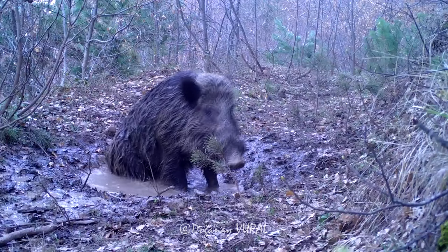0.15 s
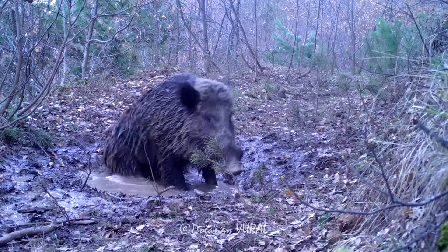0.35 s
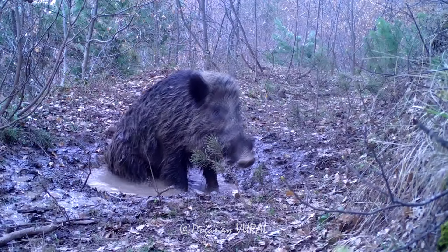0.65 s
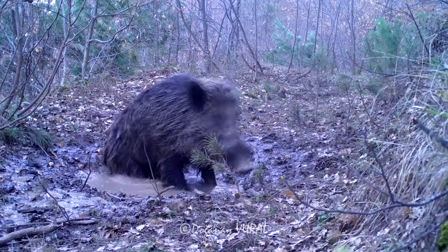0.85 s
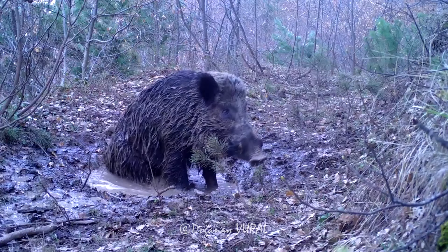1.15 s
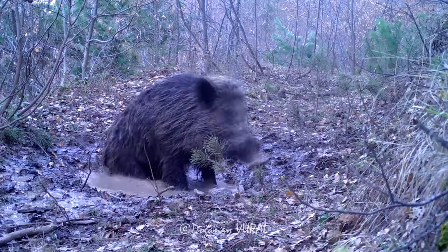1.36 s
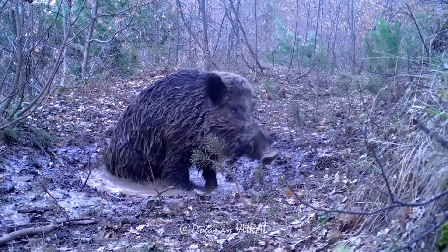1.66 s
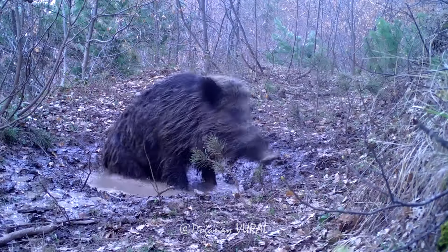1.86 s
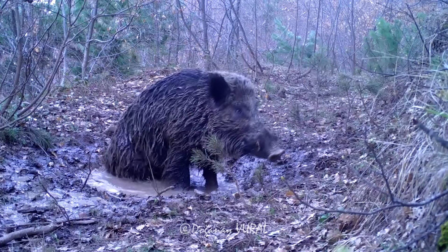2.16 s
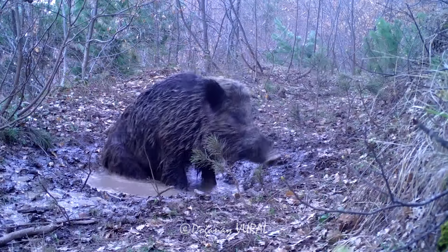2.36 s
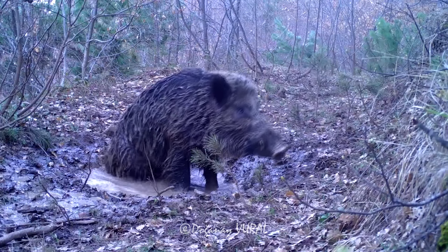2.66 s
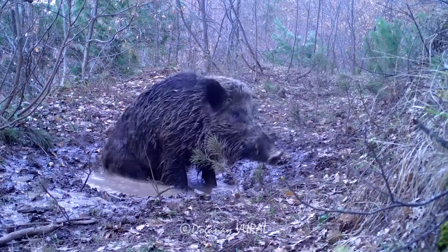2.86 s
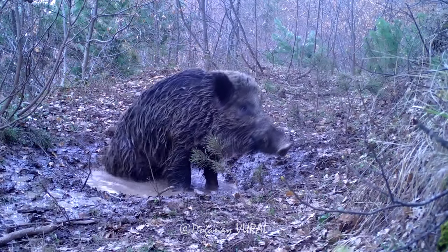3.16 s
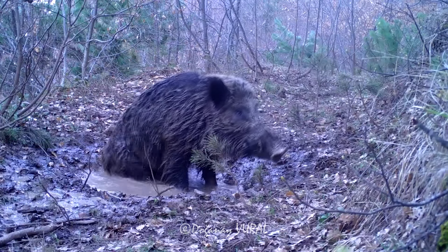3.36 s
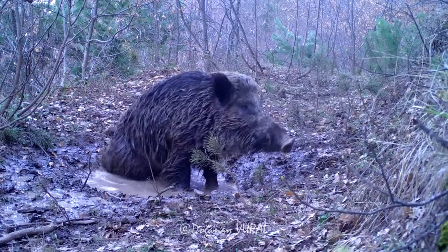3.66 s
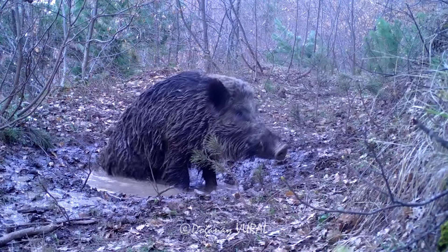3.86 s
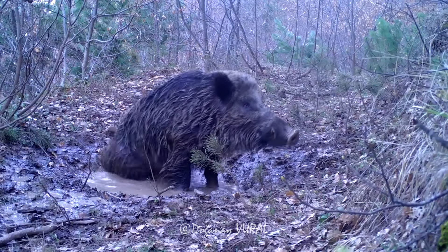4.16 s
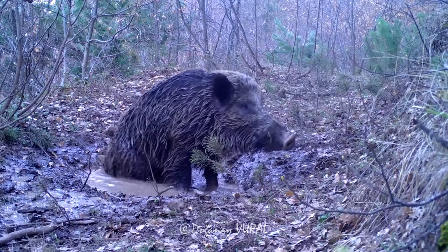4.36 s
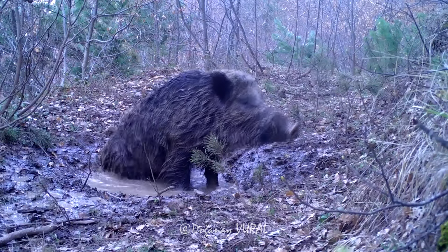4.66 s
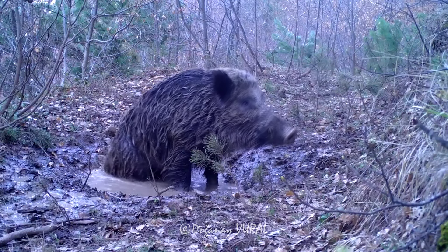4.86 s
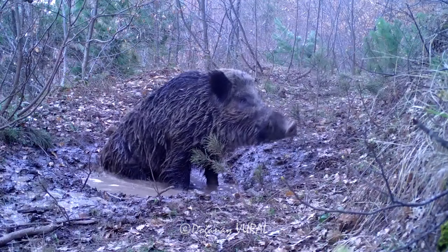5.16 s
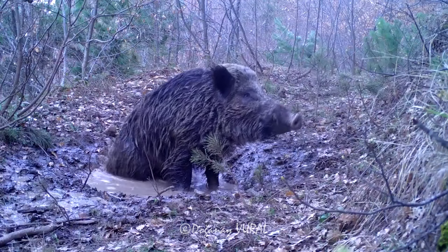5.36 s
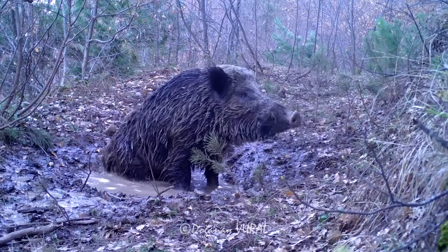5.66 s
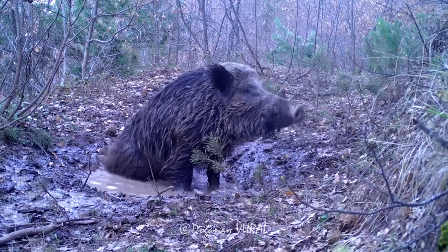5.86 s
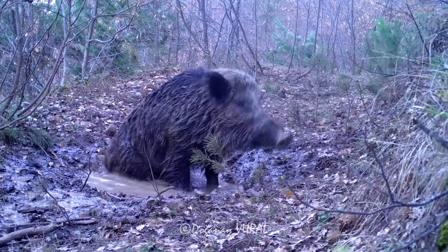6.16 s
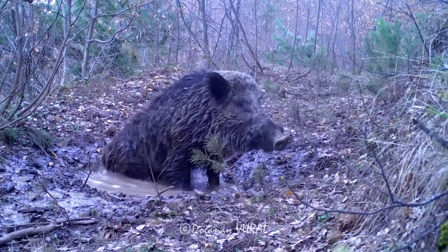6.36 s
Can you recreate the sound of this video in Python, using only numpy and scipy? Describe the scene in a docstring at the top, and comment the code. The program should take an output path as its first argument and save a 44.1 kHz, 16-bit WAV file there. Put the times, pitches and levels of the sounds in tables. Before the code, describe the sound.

A boar sits in a muddy forest puddle, smacking its wet mouth in crisp, sticky clicks, crowded in the first three seconds and sparser later. Mud fizzes and squelches softly, with small bubbly pops and gulps. High thin bird calls come near one second and more faintly later. The fairly close, dry pickup has bassy noise and a rapid steady electrical flutter.

```python
"""First comes low noise with a steady electric flutter from a trail camera, a faint bird whistle and fizzing mud.
A wild boar soon smacks its wet mouth, 36 times in 6.5 seconds, as it shifts its weight in a forest puddle.
Smacks are bursts of clicks from tearing films; pops and gulps are short rings from air pockets and bubbles.
The mud is made of countless tiny clicks and rings, the birds of gliding whistles with faint forest echoes."""
import sys
import numpy as np
from scipy import signal
from scipy.io import wavfile
from scipy.ndimage import uniform_filter1d

SR = 44100
rng = np.random.default_rng(int(sys.argv[2]) if len(sys.argv) > 2 else 0)


def unload_audio(sound):
    """Save the sound as a 16-bit wav file, at the path given as the first command line argument."""
    columns = np.transpose(np.atleast_2d(sound))
    # keep every value between -1 and 1, then stretch to whole-number steps
    steps = np.round(np.clip(columns, -1, 1) * 32767)
    wavfile.write(sys.argv[1], SR, steps.astype(np.int16))


N = 287091
TIME = np.arange(N) / SR  # seconds
LEAD = 256  # samples of soft build-up before the main click

# colour of the still forest and microphone noise: (frequency [Hz], relative level [dB per Hz])
FLOOR_COLOUR = [(8, 0), (25, -0.5), (90, -3.5), (200, -7.5), (450, -14), (700, -18.5), (1400, -27),
                (2000, -30.5), (3200, -33), (4800, -38), (7700, -40), (9500, -38.5), (13400, -45),
                (14500, -58)]
# whine of the camera electronics: (frequency [Hz], level [dB])
WHINE = [(4017, -69), (7154, -68), (7430, -66)]

# pitch and loudness along each bird note: (share of the note [0-1], pitch [Hz], relative level [dB])
SEE = [(0, 6950, -13), (.22, 7050, -2), (.42, 7550, 0), (.62, 7350, 0), (.85, 6850, -1), (1, 6450, -8)]
SLUR = [(0, 6600, -14), (.06, 5000, -4), (.15, 4300, 0), (.3, 4050, 0), (.6, 3930, -4), (1, 3780, -13)]
# second voice of a SEE, from the other side of the bird's voice organ: (share [0-1], pitch [Hz], relative level [dB])
SEE_UPPER = [(0, 7600, -1), (.3, 8400, -5), (.7, 9000, -5), (1, 9100, -5)]
# more bird notes: (share of the note [0-1], pitch [Hz], relative level [dB])
LOW_SLUR = [(0, 4600, -4), (.2, 4080, 0), (.55, 3930, -1), (1, 3790, -9)]
WHISTLE = [(0, 4630, -4), (.25, 4560, 0), (.55, 4540, -2), (1, 4570, -9)]
TRILL = [(0, 3750, 1), (.35, 3500, -5), (.7, 3200, 0), (1, 2930, -12)]
FLOURISH = [(0, 3130, -3), (.45, 3410, 0), (1, 3200, 2)]
# bird calls: (time [s], length [s], level before the note's own shape [dB], note [table above])
BIRDS = [(0, 0.19, -54.5, WHISTLE), (1.163, 0.084, -37, SEE), (1.321, 0.093, -35.5, SEE),
         (1.477, 0.16, -43, SLUR), (4.278, 0.077, -51, SEE), (4.44, 0.11, -51, SEE),
         (4.609, .15, -51.5, LOW_SLUR), (6.077, 0.041, -55, FLOURISH), (6.177, .033, -53, FLOURISH),
         (6.291, 0.088, -43, SEE), (6.426, 0.034, -53, FLOURISH), (6.456, .086, -40, SEE)]

# slow drift in how much the mud is stirred: (time [s], stirring level [dB])
STIR_DRIFT = [(0.0, -50), (0.43, -48), (0.98, -48), (1.4, -47), (1.83, -50), (4.02, -52.5), (4.11, -51.5),
              (5.66, -53.5), (6.36, -51), (6.51, -47)]
# the boar shifts its weight: (time of the peak [s], added fizz stirring [dB], added squelch stirring [dB])
WEIGHT_SHIFTS = [(.29, -55, -54), (.82, -52, -52), (1.33, -53, -53), (1.72, -44.5, -55), (3.24, -49.5, -60),
                 (3.37, -49.5, -58), (3.93, -50, -60), (4.23, -48, -56), (5.34, -50, -58.5),
                 (6.5, -46, -56)]
# colour of the fine fizz of wet mud: (frequency [Hz], relative level [dB])
FIZZ_COLOUR = [(2530, -22), (4300, -18), (4770, -47), (5100, 4), (6420, 3.5), (8050, 7), (8600, 3),
               (9650, -1.5), (11300, -4.5), (13400, -11), (14500, -22), (16000, -48)]
# colour of the coarse squelch: (frequency [Hz], relative level [dB])
SQUELCH_COLOUR = [(500, -23), (900, -4), (1400, 5.5), (2000, -11.5), (2800, 4.5), (4000, 2), (5200, 2),
                  (7000, -31)]

# air pockets that open: (time [s], length of the tear [s], starting pitch [Hz], level over 5 ms [dB])
POPS = [(.1746, 0.0046, 1320, -37.5), (.4863, 0.0023, 1080, -36.5), (.781, 0.0023, 1300, -35),
        (.804, 0.0073, 1290, -36), (1.232, 0.0041, 1280, -35.5), (1.369, 0.0029, 1320, -37),
        (1.965, 0.002, 1100, -37.5), (2.7742, 0.0027, 1270, -35.5), (2.8106, 0.0013, 1390, -30),
        (2.972, 0.0013, 1330, -40), (3.053, .0015, 1160, -37.5), (5.6005, 0.00044, 1370, -26),
        (6.1421, 0.0016, 1370, -25.5)]
# ways an air pocket rings: (multiple of its pitch [ratio], relative level [dB], time to fall 60 dB [s])
POCKET_MODES = [(.82, -13, 0.018), (1, 14.5, 0.008), (1.16, 5, 0.012)]
# the soft walls damp what lies outside: (lowest frequency [Hz], highest frequency [Hz])
POP_BAND = (796, 1830)
# single bubbles and gulps: (time [s], length [s], first pitch [Hz], last pitch [Hz], level over 5 ms [dB])
GULPS = [(.147, .013, 1330, 2100, -40.5), (.249, .016, 467, 517, -38.5), (.368, 0.022, 622, 1134, -32.5),
         (.683, .02, 1870, 2520, -39.5), (0.779, 0.043, 400, 433, -34.5),
         (2.811, 0.0087, 1150, 1080, -31.5), (5.574, .009, 2800, 3050, -35.5),
         (5.584, 0.018, 440, 456, -31.5), (5.602, 0.005, 700, 850, -37.5), (6.123, 0.017, 474, 530, -29.5),
         (6.142, .006, 650, 800, -39.5), (6.143, 0.011, 1240, 1210, -40)]

# smacks of the mouth, levels over 5 ms: (time [s], length of the tear [s], brightness guide [Hz],
# treble level [dB], middle level [dB], lips part this much earlier [s], treble level of the parting lips [dB])
SMACKS = [(0.2109, 0.00063, 6940, -30, -51, .047, -39), (.266, 0.0054, 7500, -38, -38.5, 0.024, -35),
          (.316, 0.0048, 7600, -39, -36.5, .015, -43), (.369, .0013, 7800, -34, -51, 0.0089, -55),
          (.486, .004, 6700, -27, -35.5, .02, -42), (.503, 0.0065, 7740, -23, -34.5, 0.0052, -33),
          (.733, 0.0043, 7950, -33, -37, 0.0069, -36), (.78, 0.0038, 6500, -27, -37.5, 0.0052, -40),
          (.8, .014, 7400, -37, -41, 0.0066, -40), (.893, 0.0033, 8700, -36, -48, .006, -49),
          (1.0141, 0.0046, 7400, -19.5, -34, .024, -32), (1.1806, 0.00089, 7340, -32, -46, 0.019, -41),
          (1.23, 0.0063, 7200, -34, -44, .01, -40), (1.299, 0.011, 7600, -42, -40, 0.0064, -36),
          (1.334, 0.0082, 7300, -41, -38, .004, -46), (1.37, 0.0042, 7350, -40, -34.5, .008, -44),
          (1.518, .007, 7600, -24, -32.5, .006, -30), (1.7424, 0.0012, 6360, -32.5, -54, 0.021, -50),
          (1.7901, .0025, 8050, -25.5, -43, .015, -35), (1.966, .0014, 7700, -36.5, -55, .003, -42),
          (2.022, 0.0042, 7600, -22.5, -38.5, 0.0096, -34),
          (2.2797, 0.0042, 8200, -31.5, -32.5, 0.024, -33), (2.5301, 0.0034, 7740, -25, -36, 0.013, -31),
          (2.8112, .0012, 7350, -39, -44.5, .04, -42), (2.906, 0.0058, 6500, -38.5, -54, 0.01, -40),
          (3.0453, 0.0081, 8900, -25.5, -37, 0.0089, -37), (3.109, 0.0079, 7000, -37.5, -44, 0.016, -38),
          (3.608, 0.0056, 8200, -33, -40, 0.013, -42), (3.983, 0.0013, 6400, -38, -34.5, 0.048, -42),
          (4.146, .0004, 7850, -23, -44, 0.0045, -52), (4.4378, .0015, 7800, -38, -43, 0.0065, -45),
          (4.454, 0.0051, 7800, -33.5, -44, 0.0039, -41), (5.0304, 0.00069, 7500, -35, -44, 0.014, -33.5),
          (5.5562, 0.0027, 7700, -35.5, -45, 0.0043, -44), (5.603, 0.0016, 7800, -29.5, -33, 0.017, -37),
          (6.1443, 0.0012, 7340, -30.5, -34, .0175, -32.5)]
# treble colour of a snap, before its brightness shifts it: (frequency [Hz], relative level [dB])
SNAP_TREBLE = [(3500, -54), (4900, -13), (5900, -3), (6900, -2.5), (7400, -2), (8400, 2.5), (9200, -10),
               (11000, -12), (13400, -22.5), (14200, -31), (16000, -34)]
# middle colour of a snap, before a small random shift: (frequency [Hz], relative level [dB])
SNAP_MIDDLE = [(300, -27.5), (1400, 3), (2000, -7.5), (2700, 3), (3900, 0), (4800, -8.5), (6500, -31)]

STIR_USUAL_DB = -50  # usual level of the stirring


def amp(db):
    """Turns decibels into a plain factor."""
    return 10 ** (np.asarray(db) / 20)


def evened(x):
    """Scales a sound to rms 1."""
    return x / np.sqrt(np.mean(x ** 2) + 1e-20)


def burst(x, db):
    """Scales a short sound to the energy of 5 ms at this rms level."""
    return amp(db) * x * np.sqrt(.005 * SR / (np.sum(x ** 2) + 1e-20))


def add(mix, s, sound):
    """Adds a sound into the mix, starting at s seconds."""
    part = mix[max(round(s * SR), 0):][:len(sound)]
    part += sound[:len(part)]


def colour(x, points, shift=1, size=8192):
    """Filters without ringing ahead of time, with the given spectrum and its frequencies scaled by shift."""
    hz, db = np.transpose(points)
    f = abs(np.fft.fftfreq(size, 1 / SR))
    log_gain = np.log(amp(np.interp(np.log(f + 1), np.log(hz * shift), db)))
    # this phase packs the filter's energy at its start
    taps = np.fft.ifft(np.exp(np.conj(signal.hilbert(log_gain)))).real[:size // 2]
    return signal.fftconvolve(x, taps)[:len(x)]


def wander(count, span):
    """Smooth random curve of rms 1, averaged twice over span samples."""
    once = uniform_filter1d(rng.standard_normal(count), int(span))
    return evened(uniform_filter1d(once, int(span)))


def crackle(count, per_s, spread_db):
    """Sparse clicks of either sign, a few larger than the rest."""
    size = amp(spread_db * np.minimum(rng.exponential(1, count), 4))
    sign = rng.choice([-1, 1], count)
    return size * sign * (rng.random(count) < per_s / SR)


def bubble(length, first_hz, last_hz, fade_db=17):
    """A dying ring whose pitch glides as the bubble opens or closes."""
    u = np.linspace(0, 1, int(length * SR))
    pitch = first_hz + (last_hz - first_hz) * u ** 1.3
    level = amp(-fade_db * u) * signal.windows.tukey(len(u), .2)
    return level * np.sin(2 * np.pi * np.cumsum(pitch) / SR)


def tear(length, per_s, first, build_s=0.0017, build_level=0.7, count=1500):
    """Weak clicks swell for LEAD samples up to a main click, then a run of smaller clicks dies away."""
    t = (np.arange(count) - LEAD) / SR
    dying = np.exp(-abs(t) / (1.8 * length))
    swelling = build_level * np.exp(-abs(t) / build_s)
    run = crackle(count, per_s, spread_db=1.5) * np.where(t < 0, swelling, dying)
    run /= np.linalg.norm(run) + 1e-9
    run[LEAD] += first * np.exp(-length / 0.0007)  # the shorter the tear, the stronger its main click
    return run


def snap(length, hz, high_db, mid_db, centre_hz=7600):
    """A tearing film sprays treble clicks over duller ones."""
    brightness = (hz / centre_hz) ** 0.46
    treble = colour(tear(length, per_s=6700, first=2.5), SNAP_TREBLE, brightness, size=1024)
    middle = colour(tear(length, per_s=3000, first=0.8), SNAP_MIDDLE, rng.uniform(0.96, 0.99), size=1024)
    return burst(treble, high_db) + burst(middle, mid_db)


def floor_noise():
    """The still forest and the microphone give a steady noise, strongest in the bass."""
    return amp(-37.5) * evened(colour(rng.standard_normal(N), FLOOR_COLOUR))


def camera():
    """The camera draws current in regular short gulps, which leak into the microphone line; its circuits whine."""
    gulps_per_s, first_s, width_s = 22.25, .0226, 0.00525
    since = (TIME - first_s) % (1 / gulps_per_s)
    sag = -1. * (since < width_s)
    # the link to the line blocks slow changes, and the line rounds off the edges
    sag = signal.lfilter(*signal.butter(1, 42, "high", fs=SR), sag)
    sag = signal.lfilter(*signal.butter(1, 150, fs=SR), sag)
    whine = np.zeros(N)
    for hz, db in WHINE:
        phase = 2 * np.pi * hz * TIME + 2 * wander(N, 1200)
        whine += amp(db) * np.sqrt(2) * np.sin(phase)
    return amp(-27.5) * sag + whine


def forest(x, t60, gap=0.0046):
    """Scattered echoes from the ground and trunks start after gap seconds and fall 60 dB in t60 seconds."""
    t = np.arange(SR // 2) / SR
    taps = crackle(len(t), per_s=2500, spread_db=2.5) * amp(-60 * t / t60) * (t > gap)
    return signal.fftconvolve(x, taps / np.linalg.norm(taps))[:N]


def chirp(length, db, note):
    """One nearly pure gliding whistle that wavers in pitch and strength."""
    share, hz, shape_db = np.transpose(note)
    u = np.linspace(0, 1, int(length * SR))
    pitch = np.interp(u, share, hz) * (1 + .008 * wander(len(u), span=40))
    waver_db = 1.4 * wander(len(u), span=200)
    level = amp(db + np.interp(u, share, shape_db) + waver_db) * signal.windows.tukey(len(u), .1)
    return level * np.sqrt(2) * np.sin(2 * np.pi * np.cumsum(pitch) / SR)


def birds():
    """Single calls, the SEE notes with two voices, and a faint trill of falling notes that tends to swell."""
    out = np.zeros(N)
    for s, length, db, note in BIRDS:
        add(out, s, chirp(length, db, note))
        if note == SEE:
            # the second voice starts a quarter of the way in and lasts 0.54 of the note
            add(out, s + 0.25 * length, chirp(0.54 * length, db - 8, SEE_UPPER))
    trill_start_s, trill_step_s, trill_db = 4.778, .0735, -53
    loudness_db = np.linspace(-4, 0, 12) + rng.uniform(-2.5, 2.5, 12)
    for k, loud_db in enumerate(loudness_db):
        note_s = rng.uniform(.024, .042)
        add(out, trill_start_s + k * trill_step_s, chirp(note_s, trill_db + loud_db, TRILL))
    return out


def stirring():
    """Stirring in dB for fizz and squelch: a slow drift, swells at shifts of weight, and spray after smacks."""
    squelch_usual_db, squelch_follows = -55, 0.33  # squelch moves 0.33 dB for each dB of drift
    shift_s = 0.085  # time from the peak of a shift until its power falls to 1/e
    spray_db, spray_s = -22, 0.03  # spittle fizzes on: level against the smack, decay time of its power
    drift = np.interp(TIME, *np.transpose(STIR_DRIFT))
    # powers are added, so that each cause adds its own energy
    fine = amp(drift) ** 2
    coarse = amp(squelch_usual_db + squelch_follows * (drift - STIR_USUAL_DB)) ** 2
    for s, fizz_db, squelch_db in WEIGHT_SHIFTS:
        swell = np.exp(-((TIME - s) / shift_s) ** 2)
        fine = fine + amp(fizz_db) ** 2 * swell
        coarse = coarse + amp(squelch_db) ** 2 * swell
    for s, _, _, high_db, mid_db, *_ in SMACKS:
        spray = np.exp(-abs(TIME - s) / spray_s) * (TIME > s)
        fine = fine + amp(high_db + spray_db) ** 2 * spray
        coarse = coarse + amp(mid_db + spray_db) ** 2 * spray
    return 10 * np.log10(fine), 10 * np.log10(coarse)


def froth(low_hz, high_hz, per_s, cycles, rise, spread_db=3):
    """Bubbles of many sizes burst at random, each with its own short rising ring."""
    out = np.zeros(N)
    for when, size, loud in rng.random((round(per_s * N / SR), 3)):
        hz = low_hz * (high_hz / low_hz) ** size
        db = -spread_db * np.log(loud + .03)
        add(out, when * N / SR, burst(bubble(cycles / hz, hz, hz * rise), db))
    return evened(out)


def quiet_at_rest(stir_db, rest_db=-55):
    """Follows the stirring, but fades away faster once it sinks below rest_db."""
    level = amp(stir_db)
    return level / np.sqrt(1 + (amp(rest_db) / level) ** 4)


def mud(fine_db, coarse_db):
    """Countless tiny bursts and bubbles in stirred mud and wet bristles, coming in clumps and small swells."""
    clumps = amp(3.5 * wander(N, span=260))
    swells = amp(1.5 * wander(N, span=1400))
    fizz = evened(colour(crackle(N, per_s=8400, spread_db=0.5) * clumps, FIZZ_COLOUR))
    fizz += .75 * froth(5400, 8800, per_s=130, cycles=20, rise=1.08, spread_db=3.5)
    grit = crackle(N, per_s=1100, spread_db=3.5)
    squelch = evened(colour(grit * clumps, SQUELCH_COLOUR))
    squelch += .8 * froth(1000, 3600, per_s=110, cycles=12, rise=1.2)
    fine = amp(-3.5) * fizz * quiet_at_rest(fine_db)
    coarse = squelch * quiet_at_rest(coarse_db)
    return (fine + coarse) * swells


def drips(stir_db):
    """Stray drops fall into the puddle, each with a short rising ring, louder where the mud is stirred."""
    low_hz, high_hz, cycles, rise = 1180, 3120, 11, 1.14
    loudest_db, spread_db = -45, 6  # loudest drip at the usual stirring, and range below it
    out, count = np.zeros(N), round(6 * N / SR)  # 6 per second
    for k, (when, size, tone) in enumerate(rng.random((count, 3))):
        at = int((k + when) / count * N)  # one at a random moment in each equal slot
        hz = low_hz * (high_hz / low_hz) ** tone
        db = loudest_db + stir_db[at] - STIR_USUAL_DB - spread_db * size
        add(out, at / SR, burst(bubble(cycles / hz, hz, hz * rise), db))
    return out


def ticks(stir_db):
    """Small films break in the mud, each around its own pitch, louder where the mud is stirred."""
    low_hz, high_hz = 4500, 9000
    treble_db, middle_db = 9, 6.5  # against the stirring, before the pitch filter
    sides_db = -16  # an octave from its own pitch a tick is this much weaker
    out, count = np.zeros(N), round(13 * N / SR)  # 13 per second
    for k, (when, size, long, tone) in enumerate(rng.random((count, 4))):
        at = int((k + when) / count * N)  # one at a random moment in each equal slot
        hz = low_hz * (high_hz / low_hz) ** tone
        db = stir_db[at] + np.log(size + .14)
        tick = snap(0.00069 * (.5 + 2 * long), 7800, db + treble_db, db + middle_db)
        pitch_filter = [(hz / 2, sides_db), (hz, 0), (hz * 2, sides_db)]
        add(out, at / SR, colour(tick, pitch_filter, size=1024))
    return out


def gulps():
    """Single bubbles gulp, each a dying ring with a gliding pitch."""
    out = np.zeros(N)
    for s, length, first_hz, last_hz, db in GULPS:
        add(out, s, burst(bubble(length, first_hz, last_hz), db))
    return out


def pops():
    """A tear rings a small air pocket whose pitch rises as it opens."""
    out, t = np.zeros(N), np.arange(1500) / SR
    soft_walls = signal.butter(4, POP_BAND, "band", fs=SR, output="sos")
    for s, length, hz, db in POPS:
        turns = hz * (t + t ** 2)  # cycles so far; the pitch rises by 0.2 percent each ms
        ring = np.zeros(len(t))
        for multiple, mode_db, t60 in POCKET_MODES:
            ring += amp(mode_db - 60 * t / t60) * np.sin(2 * np.pi * multiple * turns)
        pop = np.convolve(tear(length, per_s=2200, first=5.6, build_level=1.0), ring)
        pop = signal.sosfilt(soft_walls, pop)
        add(out, s - LEAD / SR, burst(pop, db))
    return out


def smacks():
    """The lips part softly, the film snaps, and the rest tears away; long tears put more into that run."""
    part_s, part_dull_db, part_bright = 0.0028, -10, 0.92  # middle against treble; brightness against the snap
    longest_snap_s = 0.00087
    run_delay_s, run_half_s = .0028, 0.0058  # a tear of run_half_s puts half its energy into the run
    out = np.zeros(N)
    for s, length, hz, high_db, mid_db, early, part_db in SMACKS:
        start = s - LEAD / SR
        run_share = length ** 2 / (length ** 2 + run_half_s ** 2)
        parting = snap(part_s, hz * part_bright, part_db, part_db + part_dull_db)
        first_snap = snap(min(length, longest_snap_s), hz, high_db, mid_db)
        run = snap(length, hz, high_db, mid_db)
        add(out, start - early, parting)
        add(out, start, np.sqrt(1 - run_share) * first_snap)
        add(out, start + run_delay_s, np.sqrt(run_share) * run)
    return out


def scene():
    """Soft ground keeps the wet sounds dry; the birds are heard through the trees."""
    fine_db, coarse_db = stirring()
    song = birds()
    trees = song + amp(-7) * forest(song, t60=.6)
    wet = mud(fine_db, coarse_db) + drips(fine_db) + ticks(fine_db) + gulps() + pops() + smacks()
    ground_echo = amp(-13) * forest(wet, t60=.05)
    tree_echo = amp(-21) * forest(wet, t60=.35, gap=.015)
    boar = wet + ground_echo + tree_echo
    return (floor_noise() + camera() + trees + boar)[None]


def record(dry):
    """The camera's band limit cuts away what lies above 15.9 kHz."""
    low_pass = signal.firwin(255, 15900, window=("kaiser", 9), fs=SR)
    return signal.oaconvolve(dry, low_pass[None], "same")


dry = scene()
out = record(dry)
unload_audio(out)
```